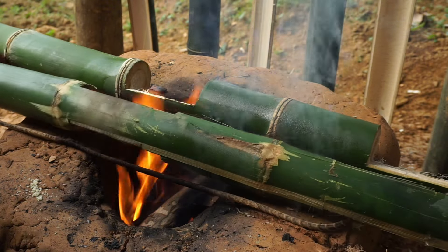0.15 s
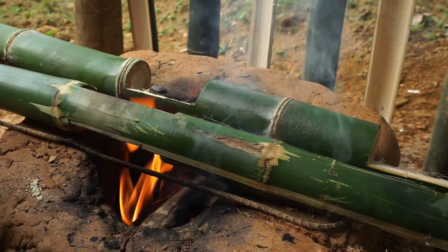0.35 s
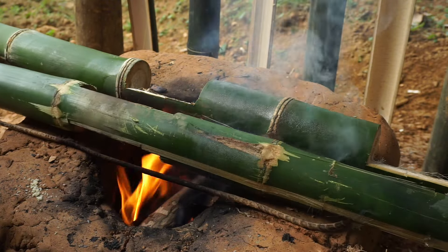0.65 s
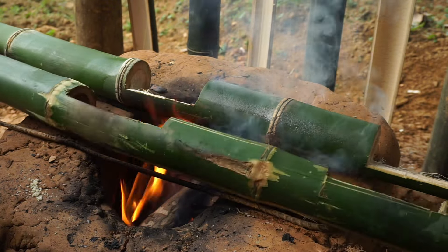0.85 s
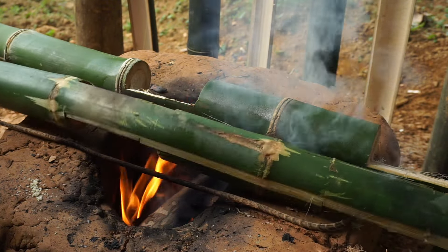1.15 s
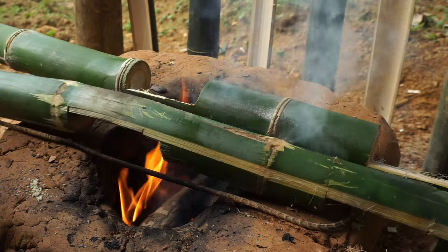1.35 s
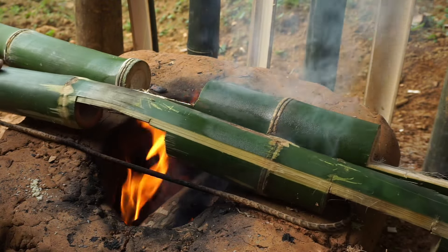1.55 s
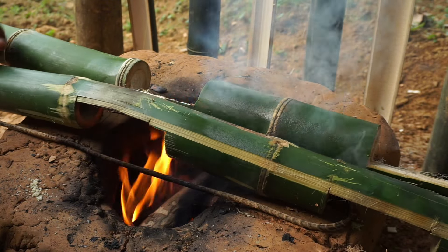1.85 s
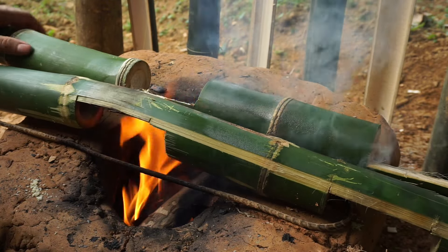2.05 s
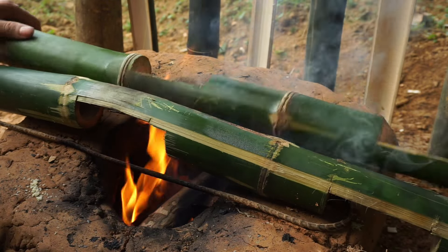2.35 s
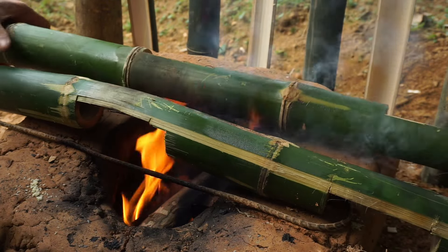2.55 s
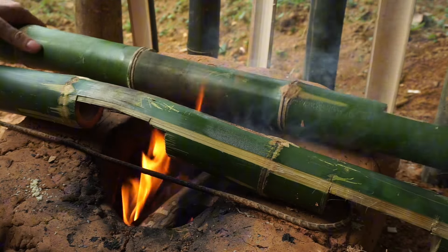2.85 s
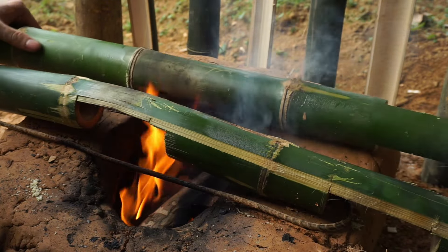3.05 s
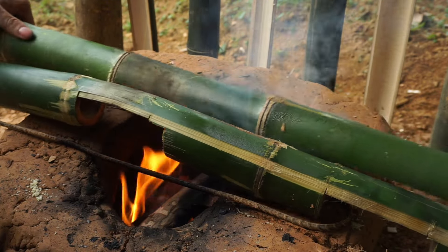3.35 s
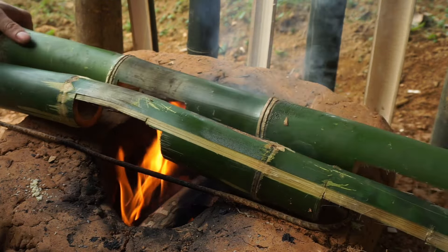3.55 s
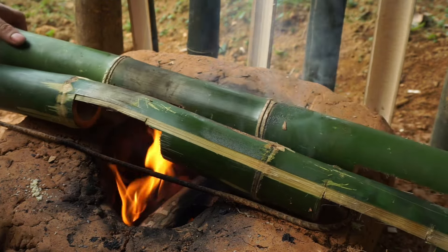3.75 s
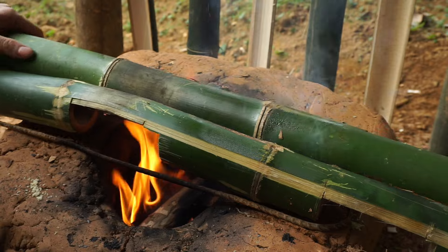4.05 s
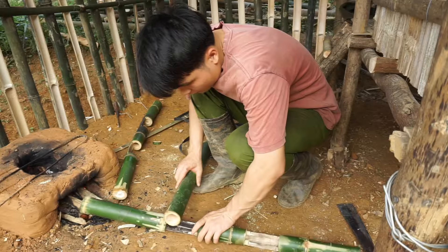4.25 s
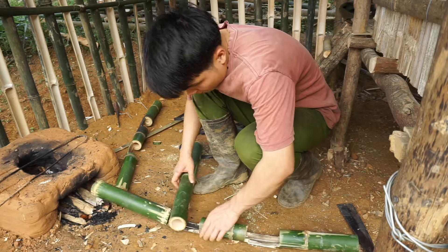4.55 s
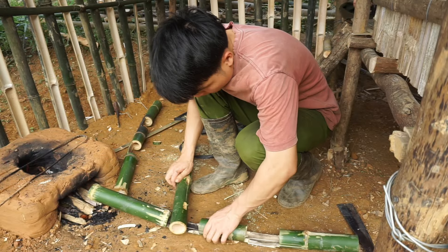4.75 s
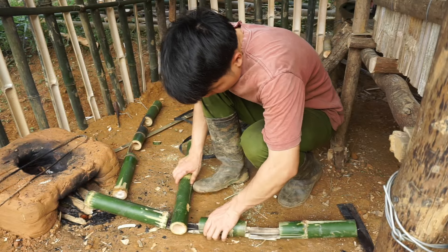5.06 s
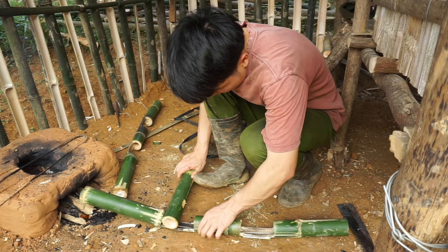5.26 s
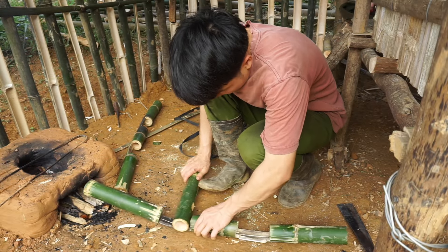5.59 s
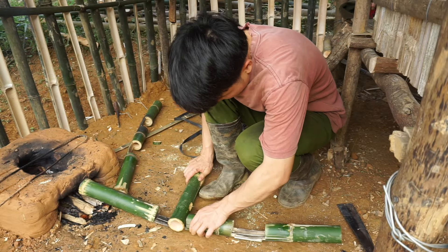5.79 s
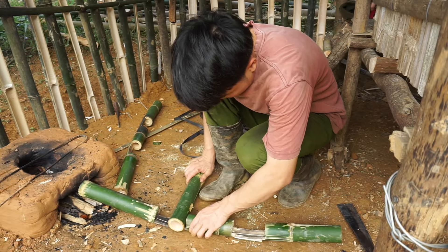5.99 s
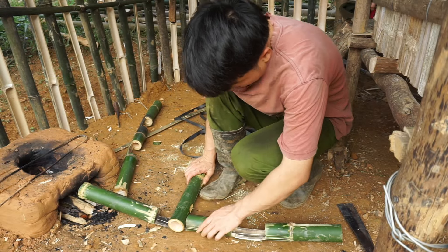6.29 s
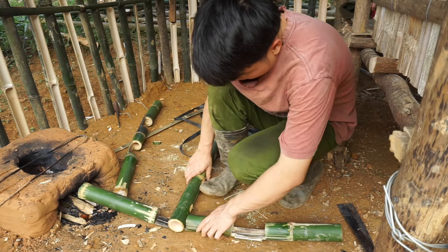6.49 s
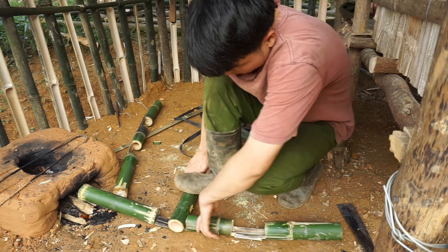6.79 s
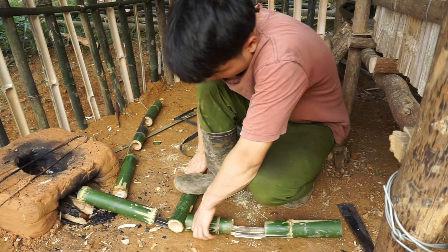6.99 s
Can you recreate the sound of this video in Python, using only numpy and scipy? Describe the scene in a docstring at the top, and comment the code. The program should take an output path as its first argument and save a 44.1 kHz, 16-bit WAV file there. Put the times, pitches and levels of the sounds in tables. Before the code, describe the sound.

Hollow green bamboo knocks and scrapes over a softly hissing, crackling fire, with insects singing behind.

```python
"""Hollow green bamboo knocks and scrapes: a pole is turned over a small fire in a clay stove, then cut
tubes are fitted together on the ground. Each blow excites damped modes of air column and wall; friction
gives band-limited noise. Fire and fibres snap, soft low bumps sound, and the open shed reflects the hits.
Behind them flames flutter and hiss and insects sing. The scene changes abruptly, with a low click,
from the stove to a place further off."""
import sys
import numpy as np
from scipy import signal
from scipy.io import wavfile

SR = 44100
rng = np.random.default_rng(int(sys.argv[2]) if len(sys.argv) > 2 else 0)


def persist_wave(psi):
    """Save psi, clipped to +-1, as 16-bit WAV."""
    counts = np.round(np.clip(psi, -1, 1) * 32767).astype(np.int16)
    wavfile.write(sys.argv[1], SR, np.atleast_2d(counts).T)


N = 314433
SCENE_CHANGE_S = 4.17   # the scene changes abruptly: background noise and insects shift in the stereo image

# Blows: t/s, level/dB, five mode-group gains/dB (low air, high air, low wall, high wall, upper),
# pan/dB (left over right), rise/ms, grip (fraction of the free decay time)
POLE_BLOWS = [(.011, -44.5, -25, -36, -41, -10, -22, -6, 2.3, 0.59),
              (.025, -33, -27, -32, -26, -4, -17, -4, 6.7, 0.64),
              (.187, -40.5, -32, -37, -16, -10, -3, -5, 5.8, 0.47),
              (1.059, -41.5, -5, -21.5, -22, -9, -12, -6, 0.92, 0.56),
              (1.109, -44.5, -4, -21, -21, -12, -11, -2, 1.4, 0.63),
              (2.4455, -43, -5, -23, -18, -10, -16, 1.5, .3, 0.13),
              (3.3218, -22.5, -9, -32, -15, -19, -13.5, -10, 1.1, 0.75),
              (3.41, -50, -10, -16, -24, -23, -17, -2, 1.5, 0.37),
              (3.443, -40.5, 8, -30, -18.5, -25, -16, 1, 1.8, 0.48),
              (4.031, -47, 11, -12, -7.5, -3.5, -9.5, -11, 1.9, 0.28)]
TUBE_BLOWS = [(4.1705, -18.5, -18, -17, -22, -11.5, -18, 10, 0.67, 0.69),
              (4.744, -34.5, -47, -9, -17, -11.5, -15, -4, .7, 0.83),
              (5.1655, -20, -8.5, -18, -8.5, -25, -25.5, 10, 0.88, 0.78),
              (5.173, -21.5, -7, -15, -4, -12.5, -22, 1, 1.9, 0.82),
              (5.209, -33.5, -3, -14, -19, -2, -18, 4, 2.1, 0.27),
              (5.368, -41.5, -4, -18, -25, -23, -25, 6, 3, 0.44),
              (5.609, -4.5, -21.5, -42, -15.5, -59, -7.5, -2, 2.8, 0.57),
              (5.615, -7, -51, -27, -45, -14, -28, -4, 6.2, 1),
              (5.65, -29.5, -12, -1, -14, -25, -25, 1.5, 3, 0.47),
              (6.7905, -18.5, -31, -34, -13.5, -16, -9, 0, 0.44, 0.34)]
# Normal modes: f/Hz, level/dB, free T60/s
POLE_MODES = [(258.6, -12, 0.21), (489.5, 18.5, 0.19), (641, 13, 0.28), (863, 15, 0.088),
              (1575, 8.5, 0.088), (1770, 16.5, 0.026), (2423, 11, 0.056), (2750, -1.5, 0.15),
              (3930, -12, 0.17)]
TUBE_MODES = [(282, -30, 0.16), (427.5, 2.5, 0.12), (502, -0.5, 0.21), (600, -1, 0.03), (653, 7.5, 0.048),
              (907.5, 4.5, 0.16), (1220, -14, 0.15), (1417, -0.5, 0.031), (1620, -36, 0.072),
              (1770, -9, 0.13), (1990, -12.5, 0.092), (2170, 1.5, 0.062), (2550, -7, 0.072),
              (2760, -30, .08), (3560, -8, 0.052), (3940, -30, 0.049), (4620, -10, 0.02),
              (4950, -28, 0.089)]
# Boundaries between the mode groups: f/Hz
MODE_GROUP_EDGES = [455, 560, 750, 1050]
# Sliding strokes: mid t/s, level/dB, start f/Hz, end f/Hz, width/octaves, duration/s, pan/dB
SCRAPE_STROKES = [(0.044, -39, 2070, 1060, 1.7, 0.055, -5), (0.106, -49.5, 7000, 8000, 1.7, 0.12, -11),
                  (0.196, -45, 3000, 2200, 4.6, 0.047, -9), (0.202, -52, 750, 746, 0.2, .034, 4),
                  (.691, -49, 1460, 1380, .5, 0.04, -4), (0.756, -47, 1760, 1470, 2.9, 0.031, -5),
                  (1.086, -41, 3500, 3200, 6.3, .075, -4.5), (1.339, -51.5, 2460, 2430, 0.4, 0.057, .6),
                  (1.53, -54, 2390, 2620, 0.52, 0.09, 3), (1.712, -48, 2200, 2000, 1.9, 0.044, -8),
                  (2.212, -47, 2240, 1030, 0.59, 0.07, 1), (3.519, -57, 1610, 2150, 0.59, .075, -1.5),
                  (3.953, -54.5, 2570, 2600, .25, 0.066, 6), (4.124, -55.5, 2600, 2510, 0.37, .06, 4),
                  (4.363, -54, 2400, 2210, 0.25, 0.038, -3), (4.454, -38.5, 790, 750, 0.6, 0.033, -6),
                  (4.458, -42.5, 3000, 4000, 4.8, 0.055, 3), (4.905, -57, 2510, 2800, 0.75, .094, .6),
                  (5.406, -52, 2210, 880, 0.72, 0.083, 10), (6.626, -41, 6000, 4970, 6.2, 0.059, 2),
                  (6.712, -53.5, 2550, 2260, 1.2, 0.21, 0), (7.085, -51, 2500, 2000, 4.4, 0.081, -5)]
# The turning pole rubs on its rest: t/s, level/dB
CHAFE_LEVELS = [(0, -61), (.9, -72), (1.2, -60.5), (1.6, -62), (1.8, -72), (2.6, -76), (2.95, -63.5),
                (3.8, -70), (4.15, -66)]
# Snaps, cracks at the onset of knocks, and a low click where the scene changes:
# t/s, level/dB, pan/dB, f/Hz, width/octaves, T60/s, lower and upper wall resonance level/dB
SNAP_EVENTS = [(.6, -40.5, 4, 3500, 4.6, 0.036, -60, -55), (1.539, -49.5, -7, 2700, 2.7, .043, -55, -58),
               (2.445, -31.5, 1, 7460, 0.68, .013, -40, -36),
               (2.638, -43, 5, 3740, 0.21, 0.059, -41.5, -40), (2.83, -38, -1, 9600, 0.5, .025, -57, -46),
               (2.84, -42, -4, 9700, 0.54, .05, -57, -57), (2.8527, -30.5, 2, 8500, 1.4, 0.019, -41, -36),
               (2.8564, -45.5, -4, 1310, 0.13, 0.073, -58, -48),
               (3.322, -26, -3, 1920, 3.7, 0.046, -30, -43), (3.6496, -48.5, 0, 5750, 1, 0.046, -67, -63),
               (3.777, -47, 3, 2200, 2.9, 0.032, -45, -62), (4.1713, -25, -3, 300, 3.5, 0.013, -42, -55),
               (4.441, -43, -11, 3460, 2.6, 0.051, -36.5, -40),
               (4.449, -35, -9, 2500, 4.7, 0.048, -54, -44), (4.5336, -46.5, 1, 1800, .8, 0.065, -48, -46),
               (4.696, -46.5, -9, 2270, 3.5, 0.17, -63, -70),
               (4.7456, -44.5, -1.5, 2930, 0.23, .06, -58, -58),
               (5.168, -40, 2, 1390, 1.1, 0.081, -54, -58), (5.3653, -43, 4, 1780, 3, .05, -55, -47),
               (5.609, -22, 2, 1720, 2.32, 0.05, -23, -25.5), (5.686, -44, -1, 940, 0.66, .04, -62, -48),
               (5.7903, -58, 5, 2320, 1.5, 0.05, -46.5, -60),
               (6.608, -43.5, 16.5, 4000, 0.15, .13, -44.5, -47),
               (6.7906, -32.5, 2.5, 690, 2.7, 0.053, -32.5, -37.5),
               (7.063, -56, -2.5, 3000, 2.3, 0.034, -53, -55)]
# Wall resonances that colour each snap: f/Hz, width/octaves
WALL_RESONANCES = [(2350, 0.47), (4250, 0.2)]
# Soft low bumps, most of them under a knock: t/s, level/dB, T60/s
BUMP_EVENTS = [(.03, -47, 0.23), (1.057, -50.5, 0.36), (3.041, -53, 0.084), (3.155, -53.5, 0.11),
               (3.326, -47.5, 0.26), (3.49, -51.5, 0.13), (4.445, -55, 0.2), (5.166, -41.5, 0.11),
               (5.611, -41.5, 0.095), (6.792, -40, 0.033)]
# Continuous noise of fire and trees: t/s, flutter level/dB, rustle level/dB, hiss level/dB
NOISE_LEVELS = [(0, -54, -50, -45), (.42, -67, -58, -50), (1.3, -66.5, -55.5, -49.5),
                (2.0, -68, -58.5, -50), (2.75, -65.5, -58.5, -49), (3.95, -67, -57.5, -50.5),
                (4.45, -62.5, -53, -49), (5.0, -66, -55.5, -51), (5.65, -60.5, -56, -50),
                (6.1, -64.5, -57, -51.5), (7.13, -62.5, -58, -51)]
# Spectral densities: f/Hz, relative level/dB
FLUTTER_SPECTRUM = [(18, -50), (30, -24.5), (161, -2.5), (261, 2), (332, 1), (468, -3), (900, -4),
                    (1170, -34), (1980, -120)]
RUSTLE_SPECTRUM = [(400, -12), (800, -2), (1500, -1), (2500, -1), (3300, -2), (5000, -15)]
HISS_SPECTRUM = [(600, -7.5), (1500, -5), (3000, -9), (4500, 1), (6000, 5), (8000, 0.5), (11500, 7.5)]
# Likeness of that noise at the two ears, at the stove and further off: f/Hz, correlation
CORRELATION_NEAR = [(60, 0.68), (140, 0.93), (340, 0.45), (810, -0.26), (1940, 0.28), (4620, -0.084),
                    (11000, -0.14)]
CORRELATION_FAR = [(60, 0.33), (140, 1), (340, 0.53), (810, -0.055), (1940, 0.02), (4620, -0.18),
                   (11000, -0.38)]
# Insect choruses: t/s, low chorus level/dB (at a crest), middle level/dB, high level/dB
CHORUS_LEVELS = [(0, -61, -56.5, -57.5), (2.3, -58.5, -59, -55.5), (2.85, -59, -63, -62),
                 (3.35, -58, -60, -55.5), (3.9, -57, -63, -79), (6.4, -56, -58, -70),
                 (7.13, -60.5, -58, -66)]
# Their songs: f/Hz, width/Hz, pulse rate/Hz, modulation depth, near pan/dB, far pan/dB, correlation
INSECT_SONGS = [(4700, 380, 27, .6, 0.5, -5, -.4), (6430, 300, 45, .2, 2.5, 0.1, -.5),
                (7820, 750, 116, .95, -6, -1.5, -.2)]


def bamboo_knocks(blows, modes):
    """Modal superposition: the point of impact weights the modes, soft contact slows the rise, grip damps."""
    out = np.zeros((2, N))
    for s, blow_db, *group_db, pan_db, rise_ms, grip in blows:
        start = round(s * SR)
        t = np.arange(min(SR // 3, N - start)) / SR
        ringing = np.zeros((2, len(t)))
        for k, (hz, mode_db, t60) in enumerate(modes):
            gain = (-1) ** k * amp(mode_db + group_db[np.searchsorted(MODE_GROUP_EDGES, hz)])
            decay = amp(-60 * t / (t60 * grip))
            directivity = np.clip(hz / 2500, .2, 1)   # low modes reach both sides alike
            ringing += gain * np.sin(2 * np.pi * hz * t) * decay * sides(pan_db * directivity)
        rise = 1 - np.exp(-1000 * t / rise_ms)
        out[:, start:start + len(t)] += amp(blow_db) * ringing * rise
    radiation = signal.butter(3, 242, "high", fs=SR, output="sos")   # thin tubes radiate little bass
    return signal.sosfilt(radiation, out + 1e-18)


def bamboo_scrapes():
    """Sliding friction: gritty noise sets in fast and crossfades through six bands from start to end."""
    out = np.zeros((2, N))
    for s, level_db, start_hz, end_hz, octaves, length_s, pan_db in SCRAPE_STROKES:
        size = int(length_s * SR)
        grains = stereo(*rng.standard_normal((2, size)), .24)
        grains *= amp(2.6 * np.minimum(rng.exponential(1, size), 5))
        progress = np.linspace(0, 1, size)
        sliding = np.zeros((2, size))
        for step in np.linspace(0, 1, 6):
            hz = start_hz * (end_hz / start_hz) ** step
            crossfade = np.maximum(0, 1 - 5 * abs(progress - step))
            sliding += crossfade * unit_rms(band(grains, hz, octaves))
        stroke = amp(level_db) * sliding * np.sin(np.pi * progress ** .85) * sides(pan_db)
        start = max(round(s * SR) - size // 2, 0)
        out[:, start:start + size] += stroke[:, :N - start]
    return out


def pole_chafe():
    """Forced resonance: light, uneven friction drives one wall mode of the pole."""
    level_db, = envelopes(CHAFE_LEVELS)
    friction = stereo(*rng.standard_normal((2, N)), .4)
    wall_mode = unit_rms(band(friction, hz=2475, octaves=.31))
    lumps_db = 4 * drift(rate_hz=8.4)
    return amp(level_db + lumps_db) * wall_mode


def snaps():
    """Impulse excitation: a tick and brief noise, as of a breaking fibre, with two wall resonances."""
    out = np.zeros((2, N))
    for s, level_db, pan_db, hz, octaves, t60, *rings_db in SNAP_EVENTS:
        add_burst(out, s, level_db, pan_db, hz, octaves, t60, correlation=.89)
        for ring_db, (ring_hz, ring_octaves) in zip(rings_db, WALL_RESONANCES):
            add_burst(out, s, ring_db, pan_db, ring_hz, ring_octaves, t60, correlation=.37)
    return out


def low_bumps():
    """Damped transients: short puffs of low noise, alike on both sides."""
    out = np.zeros((2, N))
    for s, level_db, t60 in BUMP_EVENTS:
        add_burst(out, s, level_db, pan_db=0, hz=280, octaves=.84, t60=t60, correlation=1)
    return out


def shed_echo(x, level_db=-11.5, t60=.21, delay_s=.004):
    """Diffuse reflection: posts, wall and ground return a short scatter, different at each ear."""
    t = np.arange(SR // 4) / SR
    scatter = rng.standard_normal((2, len(t))) * amp(-60 * t / t60) * (t > delay_s)
    scatter = signal.sosfilt(signal.butter(1, 18600, fs=SR, output="sos"), scatter)
    scatter /= np.sqrt(np.sum(scatter ** 2, axis=1, keepdims=True))
    return amp(level_db) * signal.fftconvolve(x, scatter, axes=1)[:, :N]


def fire_and_trees():
    """Broadband noise: flames flutter low, sap and leaves rustle, the fire and far trees hiss."""
    flutter_db, rustle_db, hiss_db = envelopes(NOISE_LEVELS)
    flutter = amp(flutter_db) * banded_noise(FLUTTER_SPECTRUM, flicker_db=1.35, rate_hz=35)
    rustle = amp(rustle_db) * banded_noise(RUSTLE_SPECTRUM, flicker_db=1.5, rate_hz=20)
    hiss = amp(hiss_db) * banded_noise(HISS_SPECTRUM, flicker_db=.92, rate_hz=83)
    return flutter + rustle + hiss * sides(pan_db=1.5)


def insects(swell_period_s=.947, crest_s=5.304):
    """Amplitude modulation: narrow noise throbs at a wavering stroke rate; the low chorus swells evenly."""
    out = np.zeros((2, N))
    t = np.arange(N) / SR
    near = t < SCENE_CHANGE_S
    low_db, middle_db, high_db = envelopes(CHORUS_LEVELS)
    dip_db = np.where(near, 6, 9) * np.sin(np.pi * (t - crest_s) / swell_period_s) ** 4
    for level_db, song in zip((low_db - dip_db, middle_db, high_db), INSECT_SONGS):
        hz, width_hz, pulse_hz, depth, near_pan, far_pan, correlation = song
        octaves = np.log2(1 + width_hz / hz)
        even_noise = np.sign(band(rng.standard_normal((2, N)), hz, octaves))   # strokes of even strength
        carrier = stereo(*band(even_noise, hz, octaves), correlation)
        cycles = np.cumsum(pulse_hz * (1 + .0365 * drift(rate_hz=3.22))) / SR
        pulses = (.5 + .5 * np.cos(2 * np.pi * cycles)) ** 2
        throb = 1 - depth * (1 - pulses)
        out += amp(level_db) * unit_rms(throb * carrier) * sides(np.where(near, near_pan, far_pan))
    return out


def add_burst(out, s, level_db, pan_db, hz, octaves, t60, correlation):
    """Exponential decay: a band-limited tick and noise tail are added to out at time s."""
    start = round(s * SR)
    t = np.arange(min(SR // 5, N - start)) / SR
    excitation = stereo(*rng.standard_normal((2, len(t))), correlation)
    excitation[:, 0] += 5   # the tick
    burst = unit_rms(band(excitation, hz, octaves)) * amp(-60 * t / t60)
    out[:, start:start + len(t)] += amp(level_db) * burst * sides(pan_db)


def banded_noise(spectrum, flicker_db, rate_hz):
    """Spectral synthesis: half-octave bands, each with its own level, flicker and correlation; rms 1."""
    out = np.zeros((2, N))
    common_drift = drift(rate_hz / 4)
    white = rng.standard_normal((2, 2, N))
    centres = 25 * 2 ** np.arange(0, 9.1, .5)
    in_range = (centres >= spectrum[0][0] * .9) & (centres <= spectrum[-1][0] * 1.1)
    change = round(SCENE_CHANGE_S * SR)
    for k, hz in enumerate(centres[in_range]):
        level_db = at_hz(spectrum, hz) + flicker_db * (.28 * common_drift + drift(rate_hz))
        pair = band(white[k % 2], hz, octaves=.52) * amp(level_db)
        out[:, :change] += stereo(*pair[:, :change], at_hz(CORRELATION_NEAR, hz))
        out[:, change:] += stereo(*pair[:, change:], at_hz(CORRELATION_FAR, hz))
    return unit_rms(out)


def band(x, hz, octaves):
    """Band-pass filtering about a geometric centre."""
    edges = np.clip(hz * 2 ** (np.array([-.5, .5]) * octaves), 20, .45 * SR)
    return signal.sosfilt(signal.butter(2, edges, "band", fs=SR, output="sos"), x)


def drift(rate_hz):
    """Random fluctuation: low-passed noise of rms 1."""
    hop, settle = 40, 2000
    r = np.exp(-2 * np.pi * rate_hz * hop / SR)
    slow = signal.lfilter([1], [1, -2 * r, r * r], rng.standard_normal(N // hop + settle + 2))[settle:]
    return np.interp(np.arange(N) / hop, np.arange(len(slow)), unit_rms(slow))


def stereo(mid, side, correlation):
    """Partial coherence: sum and difference of two noises set the left-right correlation."""
    correlation = np.clip(correlation, -.98, .98)
    return np.sqrt(.5 + correlation / 2) * mid + np.sqrt(.5 - correlation / 2) * side * [[1], [-1]]


def sides(pan_db):
    """Interaural level difference as left and right gains."""
    return amp(np.vstack([pan_db / 2, -pan_db / 2]))


def envelopes(rows):
    """Linear interpolation in time, one curve per column."""
    times, *columns = np.transpose(rows)
    return [np.interp(np.arange(N) / SR, times, column) for column in columns]


def at_hz(points, hz):
    """Interpolation on a log-frequency axis."""
    frequencies, values = np.transpose(points)
    return np.interp(np.log(hz), np.log(frequencies), values)


def amp(db):
    """Amplitude ratio of a level in decibels."""
    return 10 ** (np.asarray(db) / 20)


def unit_rms(x):
    """Normalisation to rms 1."""
    return x / np.sqrt(np.mean(x ** 2) + 1e-20)


def scene():
    """Superposition: the hits and their echo add to the direct sound of friction, fire and insects."""
    knocks = bamboo_knocks(POLE_BLOWS, POLE_MODES) + bamboo_knocks(TUBE_BLOWS, TUBE_MODES)
    hits = knocks + snaps() + low_bumps()
    return hits + shed_echo(hits) + bamboo_scrapes() + pole_chafe() + fire_and_trees() + insects()


def record(dry):
    """Band limiting: a steep low-pass removes the top treble."""
    return signal.sosfilt(signal.ellip(12, .5, 55, 11070, fs=SR, output="sos"), dry)


dry = scene()
out = record(dry)
persist_wave(out)
```